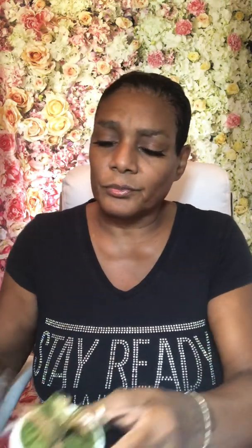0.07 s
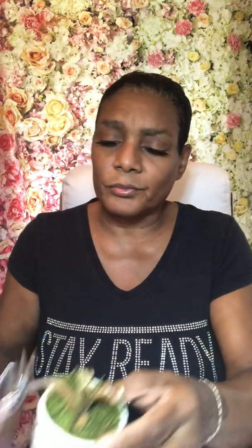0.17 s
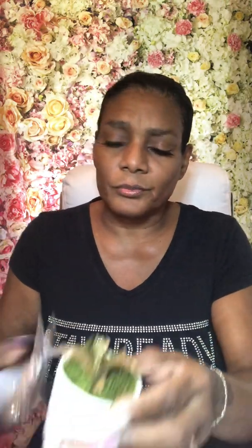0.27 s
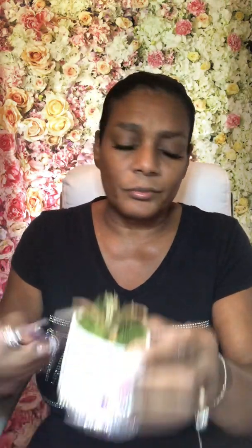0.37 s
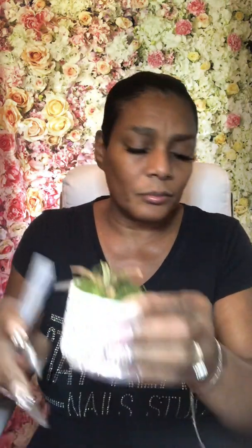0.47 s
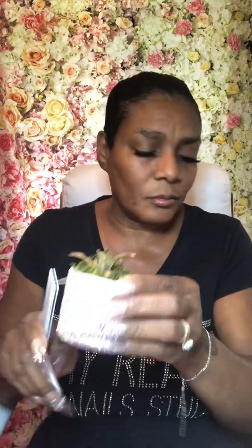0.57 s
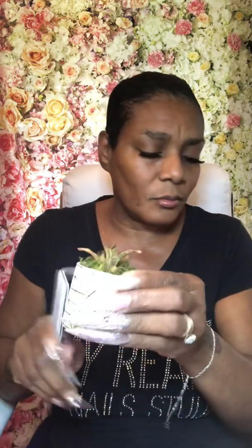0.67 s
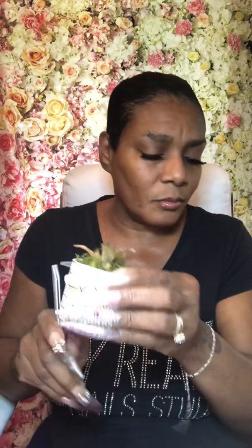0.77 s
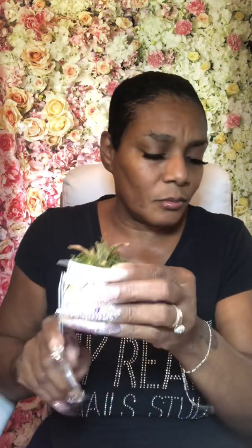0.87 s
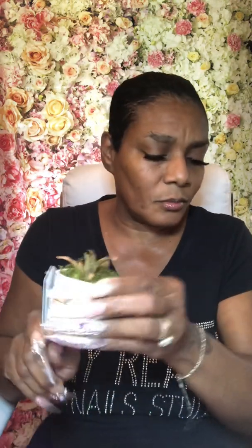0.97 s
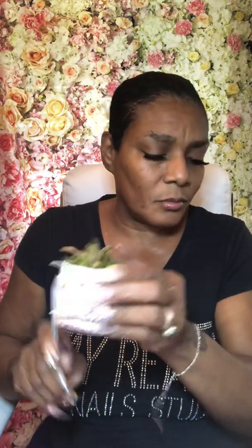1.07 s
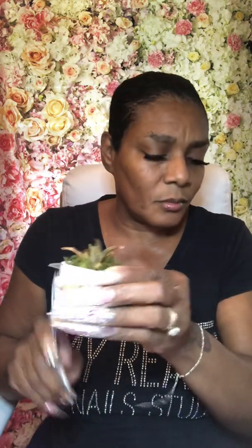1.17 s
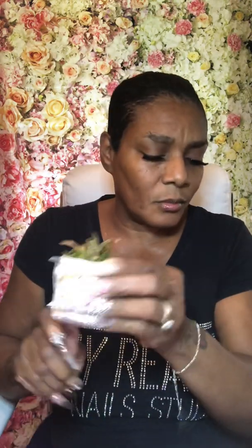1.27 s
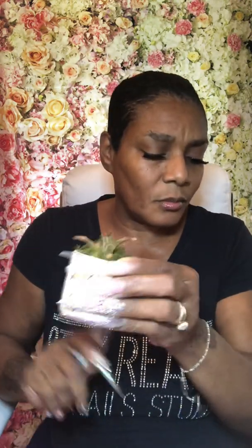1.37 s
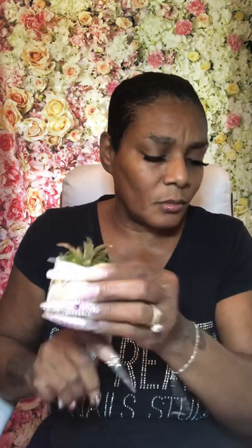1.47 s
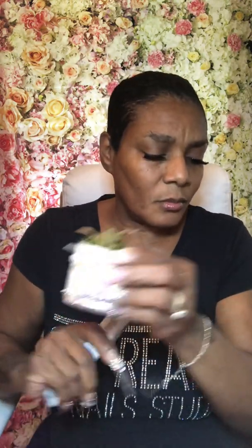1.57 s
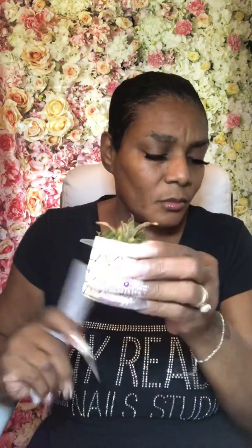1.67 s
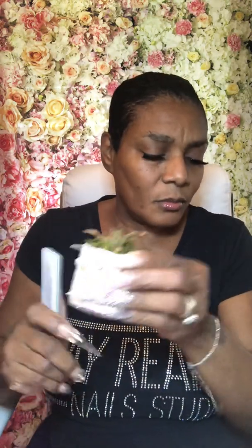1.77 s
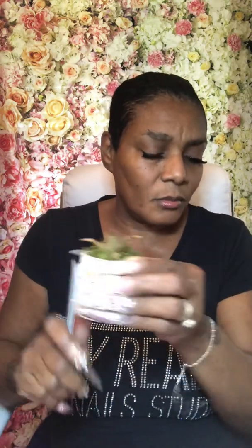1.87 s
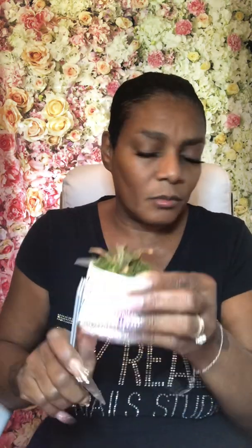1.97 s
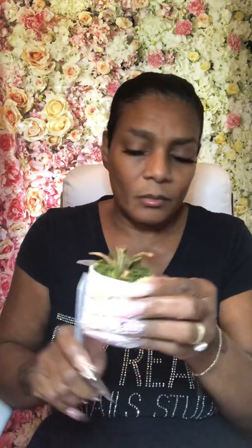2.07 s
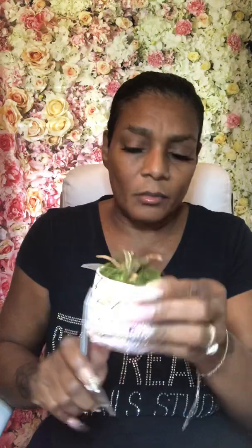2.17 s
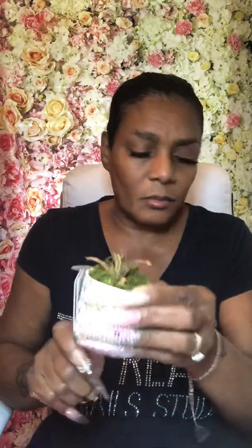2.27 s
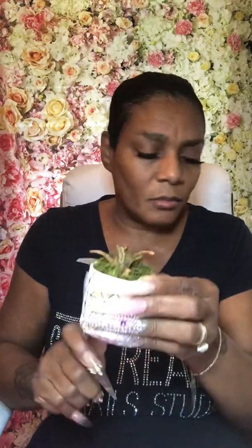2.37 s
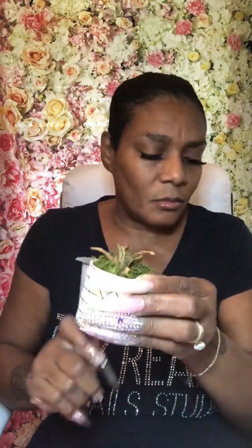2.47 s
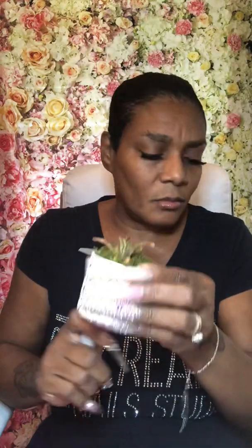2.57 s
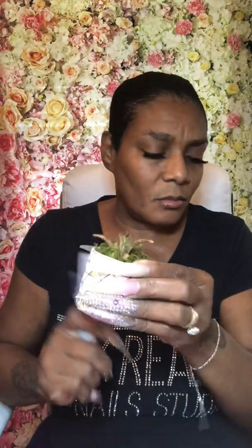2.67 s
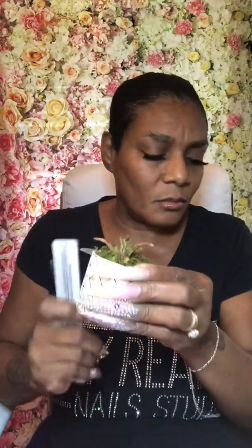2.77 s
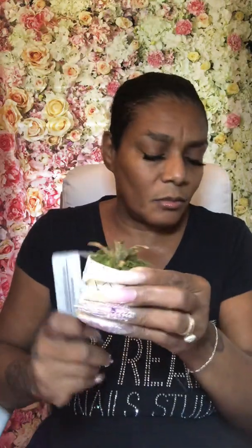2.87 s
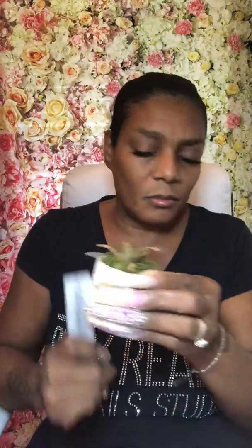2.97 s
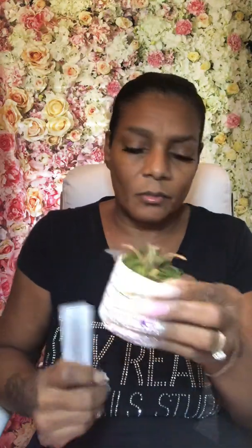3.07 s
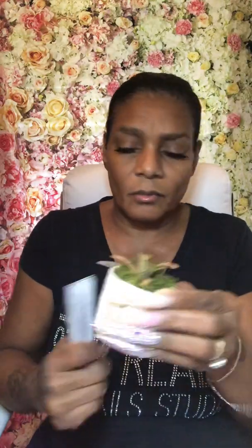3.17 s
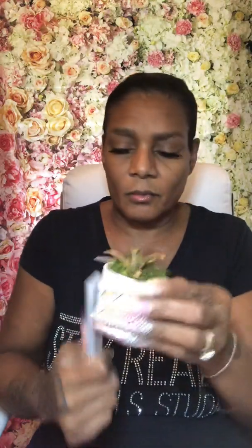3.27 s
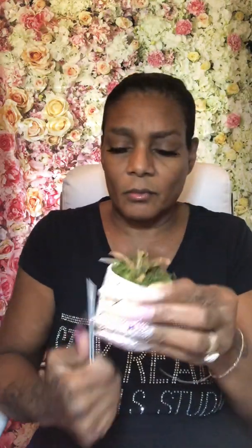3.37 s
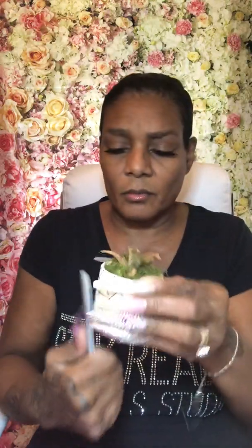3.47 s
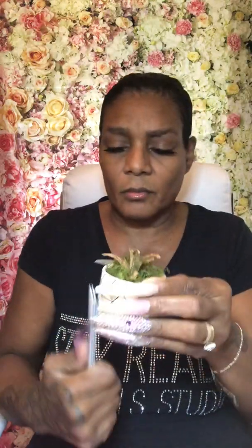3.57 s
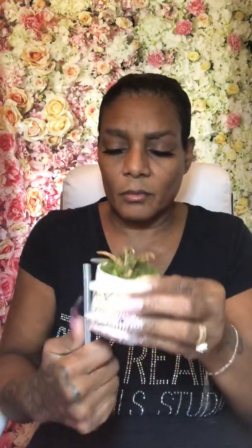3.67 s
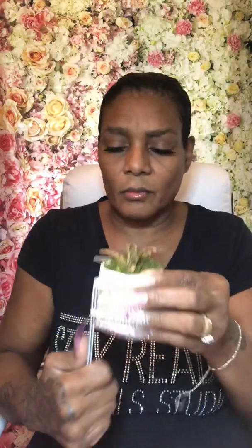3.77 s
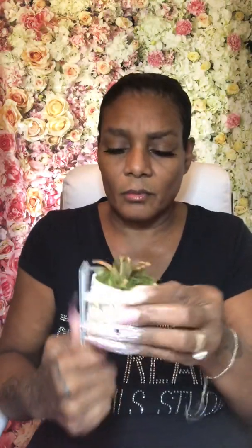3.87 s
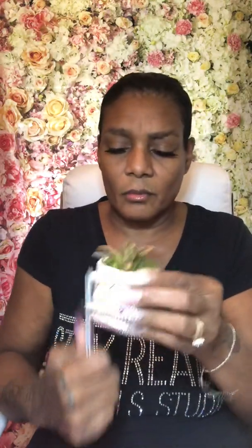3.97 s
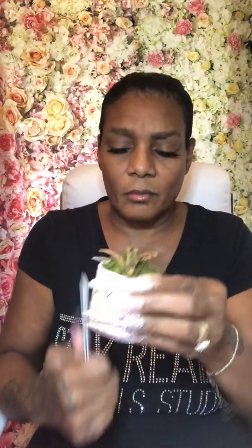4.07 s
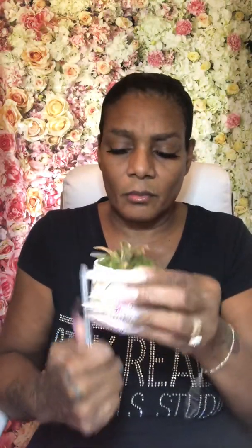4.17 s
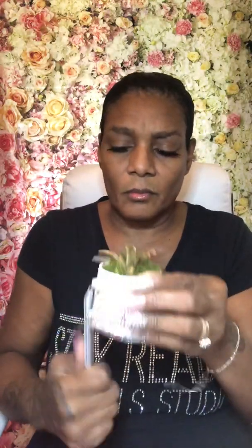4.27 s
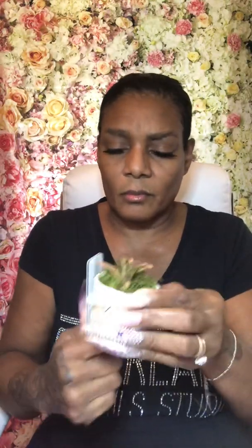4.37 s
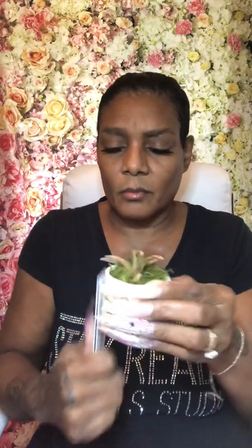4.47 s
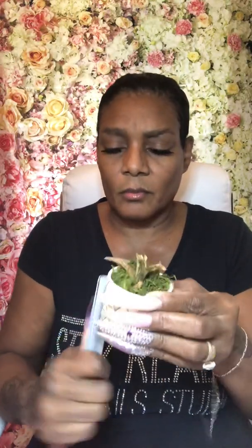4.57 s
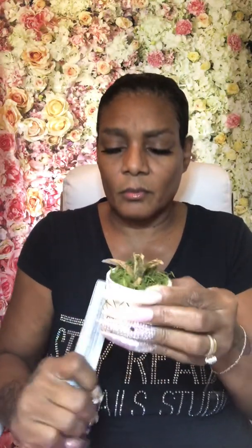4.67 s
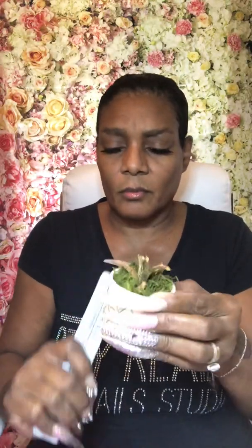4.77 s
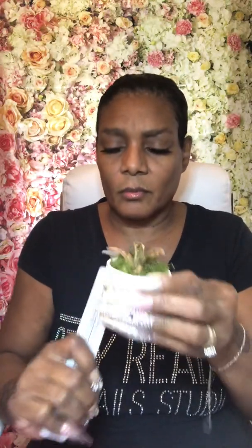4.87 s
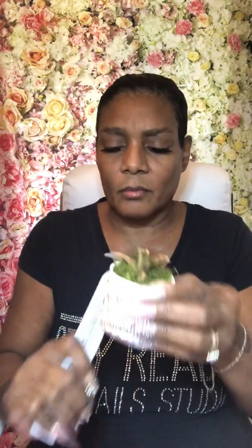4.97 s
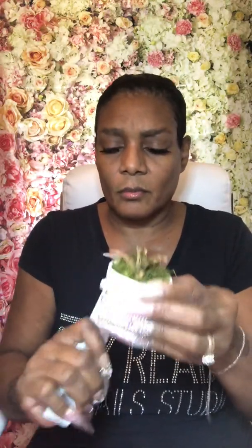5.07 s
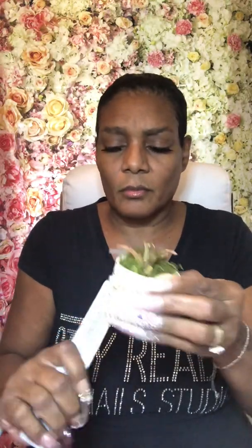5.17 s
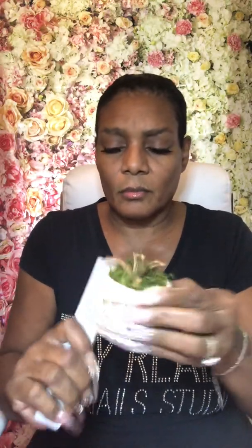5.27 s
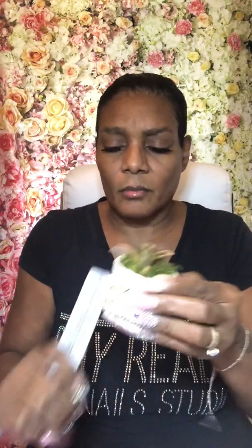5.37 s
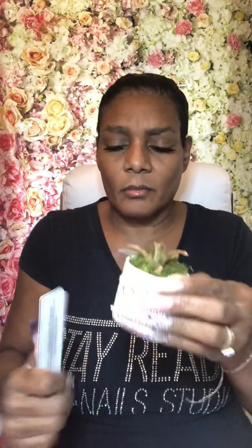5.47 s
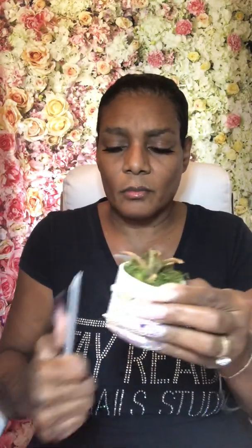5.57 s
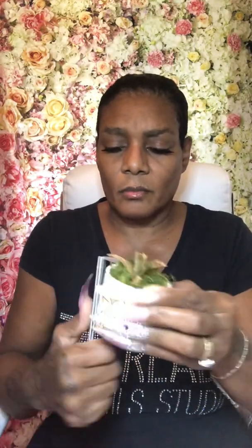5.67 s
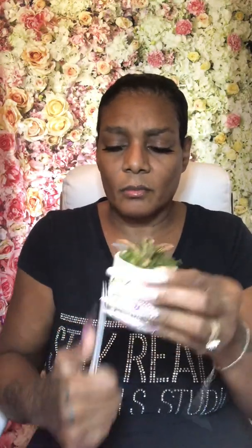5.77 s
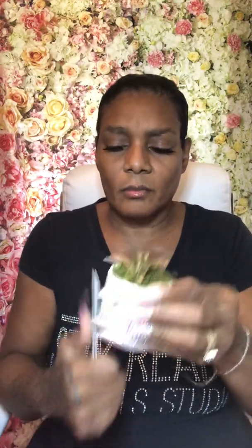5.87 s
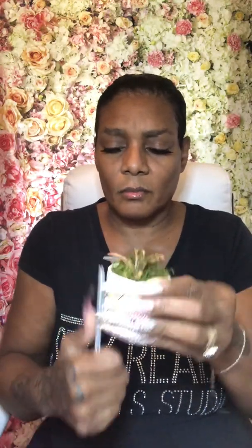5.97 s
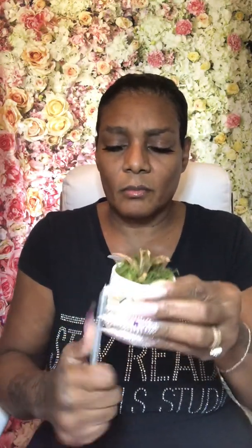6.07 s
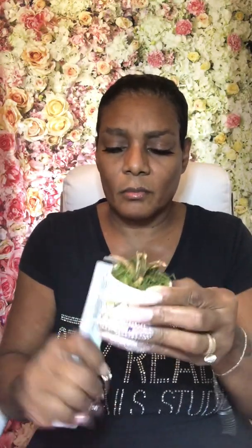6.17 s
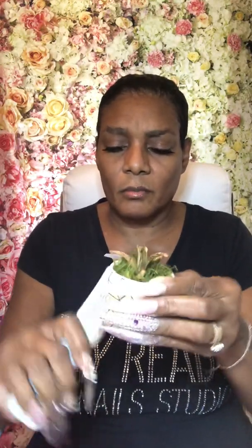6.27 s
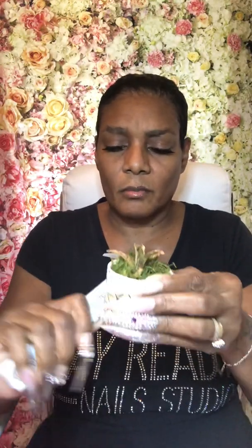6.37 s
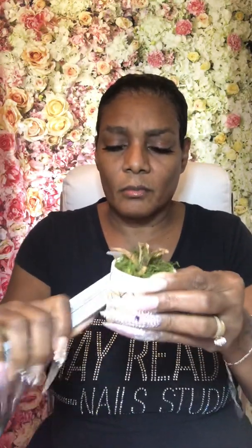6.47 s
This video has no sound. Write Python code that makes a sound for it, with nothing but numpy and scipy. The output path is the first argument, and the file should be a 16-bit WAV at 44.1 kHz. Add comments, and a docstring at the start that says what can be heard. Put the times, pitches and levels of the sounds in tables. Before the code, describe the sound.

Light taps and faint scrapes open in a quiet, slightly echoing room, over a low, steady murmur of ventilation. A few sharper clicks come at about 0.8 seconds. From about 1 second a gritty hand file rasps quickly back and forth over hard artificial nails, roughly eight strokes a second. A sharp tap stops it near 1.5 seconds, and small ticks fill the pause. A second short run goes from 2 seconds until 2.7 seconds, when the file knocks a small hand-held glazed pot, which clinks once, briefly. A single stroke and a few more taps follow around 3 to 3.3 seconds. From about 3.4 seconds a long run of dry, bright strokes carries on, easing near 5 seconds and pausing briefly around 5.6 seconds, then continuing to the end at about 6.5 seconds.

```python
"""In a quiet, lively room, light taps and faint strokes open over the murmur of ventilation.
From about 1 s a gritty hand file rasps quickly to and fro over hard artificial nails: friction
drives the resonances of nail, file and a small pot held in the hand. Impacts of nail and file
fall between the runs, and at 2.7 s the pot clinks once in free vibration. After a few more taps
a long run of strokes lasts to the end, easing for a moment near 5 s."""
import sys
import numpy as np
from scipy import signal
from scipy.fft import rfft, irfft, next_fast_len
from scipy.io import wavfile
from scipy.ndimage import uniform_filter1d, map_coordinates

SR = 44100
rng = np.random.default_rng(int(sys.argv[2]) if len(sys.argv) > 2 else 0)


def master_out(mix):
    """Clip the mix to full scale and print it as 16-bit PCM to the path in sys.argv[1]."""
    frames = np.transpose(np.atleast_2d(mix))
    ceiling = np.clip(frames, -1, 1)
    pcm = np.round(ceiling * 32767).astype(np.int16)
    wavfile.write(sys.argv[1], SR, pcm)


N = 288318

# strokes of the file: start_s, length_s, swell_db, nail_db, keenness_db
FILE_STROKES = [(0.1, 0.086, 16, -65, -3), (0.352, 0.15, -16, -61.5, -9), (0.405, 0.019, 2.5, -59.5, -9),
                (0.519, 0.062, 11, -63, -1), (0.788, 0.084, -2, -49, -5), (0.932, 0.055, 3, -41.5, -6),
                (1.022, 0.074, 4, -38.5, 3.5), (1.139, 0.093, -4, -35.5, 3), (1.262, 0.074, 4, -39.5, -4),
                (1.377, 0.067, 3.5, -36.5, -5), (1.457, 0.17, -15, -54, -9), (1.654, 0.029, 1, -54.5, -18),
                (1.868, 0.045, -6, -58.5, -8), (1.969, 0.069, -4.5, -38.5, 5.5),
                (2.074, 0.058, 2.5, -38, 8.5), (2.182, 0.086, -5, -36.5, 5.5), (2.307, 0.078, -8.5, -38, 2),
                (2.437, 0.087, -5.5, -40, -3), (2.551, 0.077, -7, -44.5, -1), (2.631, 0.069, 5, -45.5, -17),
                (2.707, 0.028, -5, -35.5, -2), (2.74, 0.083, -4, -49, -13), (2.826, 0.038, 7, -48, -14),
                (3.016, 0.14, 1.5, -42.5, 4.5), (3.266, 0.044, -3, -51, -13), (3.374, 0.061, 0.5, -37, -4),
                (3.477, 0.075, 1, -39.5, -4.5), (3.588, 0.068, -1.5, -40.5, -5),
                (3.677, 0.083, 14, -40.5, -7), (3.812, 0.08, -0.5, -39, 4),
                (3.921, 0.085, -6.5, -37.5, 2.5), (4.042, 0.093, -4, -37.5, 1.5),
                (4.168, 0.067, -2.5, -37.5, -8), (4.293, 0.079, -10.5, -41.5, -2),
                (4.391, 0.086, 3.5, -36, 7), (4.522, 0.1, -1.5, -35.5, 5.5), (4.727, 0.066, 11.5, -48, 2),
                (4.849, 0.075, -2.5, -50, -0.5), (4.964, 0.072, 5, -46, -1.5), (5.078, 0.077, 8, -42, -1),
                (5.195, 0.09, -3, -42, -1), (5.3, 0.051, -2, -49, -4.5), (5.352, 0.051, -3, -45, -3),
                (5.421, 0.084, 5, -39, 0.5), (5.779, 0.011, -10, -46, -7), (5.814, 0.086, 7.5, -37.5, 4),
                (5.938, 0.093, -1, -39, -3), (6.082, 0.084, 1.5, -40.5, 3.5),
                (6.194, 0.086, -1.5, -38.5, 6), (6.331, 0.07, 5.5, -48.5, -9), (6.418, 0.062, 2, -48.5, -5),
                (6.499, 0.038, 6, -42.5, -2)]
# resonances of each part (nail, tip, grit, file edge, file board, pot): pitch_hz, width_hz, level_db
PART_MODES = [
    [(5640, 1270, -1.5), (6224, 580, 1), (7145, 1880, -1)],
    [(8840, 3100, 1), (11300, 3100, -4.5)],
    [(13300, 3200, -4), (15600, 2600, 0)],
    [(4300, 1100, 0)],
    [(1930, 640, -2.5), (2603, 910, -3), (3446, 1660, 2)],
    [(835, 460, 12), (1446, 480, 8)],
]
# how the hold shares the force, relative to the nail: time_s, tip_db, file_db, pot_db
HOLD_BALANCE = [(0.1, -8, -3.5, -15), (0.8, -8, -5.5, -15.5), (1.15, -10.5, -13, -23.5),
                (1.4, -4.5, -7, -20.5), (2.0, -10, -8.5, -14.5), (2.3, -10.5, -10.5, -20.5),
                (2.6, -6, -4.5, -12.5), (2.72, -4.5, -9, -25), (3.05, 1.5, -6, -12), (3.4, 2, -16, -23.5),
                (3.5, -5.5, -11.5, -13), (4.05, -8, -14.5, -19.5), (4.6, -8, -12, -18), (4.75, 1, -8, -7.5),
                (4.9, 1.5, -1, -3.5), (5.12, 2.5, -7.5, -13), (5.25, 3.5, -8, -9.5), (5.36, -0.5, -9, -22),
                (5.97, -7, -14, -18), (6.24, -5.5, -14, -17), (6.35, 9, -5.5, -17),
                (6.52, -1.5, -10.5, -22)]
# how unevenly the grains catch, for each part: spread_db
CLUMP_SPREADS = [0.82, 1.66, 1.9, 2.1, 1.25, 2.2]
# power law of force against speed, for each part (fast is brighter): exponent
SPEED_EXPONENTS = [1.08, 1.7, 1.9, 0.76, 0.83, 0.53]
# taps, the last three relative to level_db: start_s, level_db, file_pitch_hz, file_db, tip_db, pot_db
IMPACTS = [(0.077, -40, 2950, -19, -28, -12), (0.109, -45.5, 3680, -4.5, -1, -7),
           (0.1277, -37, 3300, -17, -10, -5), (0.1436, -31.5, 4900, -10, -10, 1.5),
           (0.2364, -33, 3180, -10, -12, -3), (0.337, -41, 2950, -6, -10, -10),
           (0.3471, -32.5, 2860, -7, -10, -4.5), (0.4456, -42, 4470, -7, -3, -19),
           (0.565, -35, 2900, -3, -22, 1), (0.6207, -31, 3030, -9, -8, -4.5),
           (0.627, -34.5, 4360, -7, -7, -16), (0.6374, -44, 5060, -17, -4, -15),
           (0.769, -19, 3380, -4.5, -9.5, -18), (0.784, -19, 3500, -18, -15, -13),
           (0.805, -24.5, 4700, -10, -17, -34), (1.459, -25, 3880, -1.5, -22, -11),
           (1.4651, -14.5, 3750, -9.5, -36, -13.5), (1.695, -41, 2740, 0, -33, 5),
           (1.732, -45, 3950, -16, -12, 12), (1.751, -39.5, 3200, -14, 0, -2),
           (1.9211, -22, 2670, -13, -12, -13), (2.709, -18, 3260, -9, -18, -28),
           (2.9552, -30, 4900, -14, -8, -8), (2.981, -43, 5020, -9, 2, -4),
           (3.3182, -23.5, 2990, -13, 2, -3), (3.344, -23.5, 4950, -20, -4, -13)]
# dull resonance of the fingers round the pot: pitch_hz, width_hz, level_db
FINGER_MODES = [(480, 240, 0)]
# the knock on the pot: start_s, level_db
POT_KNOCK = (2.7095, -34.5)
# free modes of the pot: pitch_hz, level_db, t60_s
POT_MODES = [(1520, 1, .06), (1672, -3, .2), (3240, 3, .07), (3360, -3, .24), (4945, -5, .24),
             (5460, 4, .08), (5890, 2, .09), (6175, 2, .08), (6600, 3, .06), (7520, -7, .1)]
# reverberation time of the room: frequency_hz, t60_s
ROOM_DECAY = [(500, 0.48), (3000, 0.61), (7000, 0.59), (10000, 0.29), (15000, 0.34)]
# spectrum of the ventilation: frequency_hz, relative_density_db
AIR_SPECTRUM = [(15, -42), (25, -16), (76, -3.5), (285, -3), (624, -12.5), (677, -11.5), (1230, -14),
                (1790, -17), (2000, -18), (2280, -18), (7310, -30), (16000, -44)]
# faint hums in the ventilation: pitch_hz, width_hz, level_db
HUM_BANDS = [(141.4, 17, -2.5), (257, 8.7, 0), (364, 4.8, -3)]


def rasp(rise_power=4.6, fall_power=3.8, end_drop_db=6.5):
    """Friction forces each part to vibrate, the harder the faster the file slides."""
    force = np.zeros((len(PART_MODES), N))
    t = np.arange(N) / SR
    hold_s, *held = np.transpose(HOLD_BALANCE)
    for start, length, swell_db, nail_db, keen_db in FILE_STROKES:
        tip_db, file_db, pot_db = (np.interp(start + length / 2, hold_s, db) for db in held)
        edge_db = file_db - 0.5 + 0.21 * tip_db
        # a keen cut drives tip and grit more, the pot less
        share = amp([0, tip_db + 0.84 * keen_db, keen_db - 7.5,
                     edge_db, file_db, pot_db - 0.52 * keen_db])
        near = slice(max(round((start - length) * SR), 0), round((start + 2 * length) * SR))
        travel = 2 * (t[near] - start) / length - 1  # -1 to 1 over the stroke
        taper = np.abs(travel) ** np.where(travel < 0, rise_power, fall_power)
        speed = amp(swell_db * travel / 2 - end_drop_db * taper)
        force[:, near] += amp(nail_db) * share[:, None] * speed ** np.c_[SPEED_EXPONENTS]
    drag = amp(1.43 * wobble(70) + 0.48 * wobble(400))
    snags = 1 + amp(10) * (rng.random(N) < 60 / SR)  # about 60 coarse grains a second
    rings = [resonate(push * drag * snags * grit(spike_db=2.5, clump_db=clump), modes)
             for push, modes, clump in zip(force, PART_MODES, CLUMP_SPREADS)]
    return sliding_contact(sum(rings), patchy_db=2.0)


def grit(spike_db, clump_db):
    """Surface roughness makes a random force: grains catch unevenly, in clumps of about 2 ms."""
    noise = rng.standard_normal(N)
    catch_db = spike_db * rng.standard_normal(N) + clump_db * wobble(500)
    return unit_rms(noise * amp(catch_db))


def sliding_contact(x, patchy_db):
    """A moving point of excitation on nail and file shifts the timbre in patches."""
    spectra = signal.stft(x, nperseg=256)[2]
    patches = uniform_filter1d(rng.standard_normal(spectra.shape), size=3, axis=0)
    patches = uniform_filter1d(patches, size=12, axis=1)
    return signal.istft(spectra * amp(patchy_db * unit_rms(patches)), nperseg=256)[1][:N]


def taps(attack_s=0.0018, t60_s=0.015, chatter_db=-2.5, tick_db=6, thud_db=-4):
    """Impact excitation: a brief chatter of contact rings the parts, and the struck file ticks."""
    force = np.zeros((len(PART_MODES), N + SR))
    tick = np.zeros(N + SR)
    t = np.arange(SR // 10) / SR
    for start, db, file_hz, file_db, tip_db, pot_db in IMPACTS:
        fade = amp(db - 60 * t / t60_s) * (1 - np.exp(-t / attack_s))
        near = slice(round(start * SR), round(start * SR) + len(t))
        share = amp(chatter_db) * amp([0, tip_db, tip_db - 3, file_db, file_db + 3, pot_db])
        force[:, near] += share[:, None] * fade * rng.standard_normal((len(PART_MODES), len(t)))
        scatter = np.cumsum(rng.normal(0, 0.2, len(t)))  # wandering phase roughens the tick
        tick[near] += amp(file_db + tick_db) * fade * np.sin(2 * np.pi * file_hz * t + scatter)
    thud = amp(thud_db) * resonate(force[-1, :N], FINGER_MODES)
    chatter = sum(resonate(push[:N], modes) for push, modes in zip(force, PART_MODES))
    return tick[:N] + thud + chatter


def pot_clink(attack_s=0.001):
    """Damped free vibration of the glazed pot, knocked by the file; the grip makes its modes waver."""
    start, level_db = POT_KNOCK
    t = np.maximum(np.arange(N) / SR - start, 0)
    ring = np.zeros(N)
    for hz, db, t60 in POT_MODES:
        fade = amp(db - 60 * t / t60 + 2.3 * wobble(48.96))
        ring += fade * np.sin(2 * np.pi * hz * t + 1.15 * wobble(110))
    return amp(level_db) * ring * (1 - np.exp(-t / attack_s))


def reverberation(x, delay_samples=250):
    """A diffuse field decays exponentially, each frequency at its own rate."""
    wet = np.zeros(N + 2 * SR)
    hop = SR // 3  # a new random tail every third of a second
    for start in range(0, N, hop):
        hz, t, spectra = signal.stft(rng.standard_normal(SR // 2), SR, nperseg=256)
        decay = amp(-60 * t / log_interp(ROOM_DECAY, hz)[:, None])
        tail = signal.istft(spectra * decay, SR, nperseg=256)[1]
        echo = signal.fftconvolve(x[start:start + hop], tail / np.linalg.norm(tail))
        arrival = start + delay_samples
        wet[arrival:arrival + len(echo)] += echo
    return wet[:N]


def ventilation(air_db=-56, hum_db=-64.5):
    """Broadband noise makes a low murmur; narrow bands of noise are heard as wavering hums."""
    air = unit_rms(filtered(rng.standard_normal(N), lambda hz: amp(log_interp(AIR_SPECTRUM, hz))))
    hum = resonate(rng.standard_normal(N), HUM_BANDS)
    drift = amp(0.5 * wobble(2))
    return drift * (amp(air_db) * air + amp(hum_db) * hum)


def resonate(x, modes):
    """Superposition of steep causal resonances, with unit gain for white noise."""
    def response(f):
        return sum((-1) ** k * amp(db) * (f * width / (hz * hz - f * f + 1j * f * width)) ** 2
                   for k, (hz, width, db) in enumerate(modes))
    power = np.mean(np.abs(response(np.linspace(0, SR / 2, num=16384))) ** 2)
    return filtered(x, response) / np.sqrt(power)


def filtered(x, response):
    """Linear filtering: the spectrum times a frequency response."""
    size = next_fast_len(N + SR // 2)
    return irfft(rfft(x, size) * response(np.fft.rfftfreq(size, 1 / SR)), size)[..., :N]


def wobble(rate_hz):
    """Smooth random modulation, with rate_hz knots a second."""
    knots = rng.standard_normal(int(N * rate_hz / SR) + 4)
    return map_coordinates(knots, [np.arange(N) * rate_hz / SR])


def log_interp(points, hz):
    """Interpolation on a logarithmic frequency axis."""
    knots_hz, values = np.transpose(points)
    return np.interp(np.log(hz + 1), np.log(knots_hz + 1), values)


def amp(db):
    """Amplitude ratio of a level in decibels."""
    return 10 ** (np.asarray(db) / 20)


def unit_rms(x):
    """Normalisation to unit mean power."""
    return x / np.sqrt(np.mean(x ** 2) + 1e-20)


def scene():
    """Superposition of direct sound, reverberant field and background, in one channel."""
    direct = rasp() + taps() + pot_clink()
    return (direct + amp(-10.5) * reverberation(direct) + ventilation())[None]


def record(dry):
    """Band limiting: a steep low-pass passes nothing above stop_hz."""
    stop_hz, slope_width_hz = 15860, 150
    return filtered(dry, lambda hz: np.clip((stop_hz - hz) / slope_width_hz, 0, 1) ** 2)


dry = scene()
out = record(dry)
master_out(out)
```